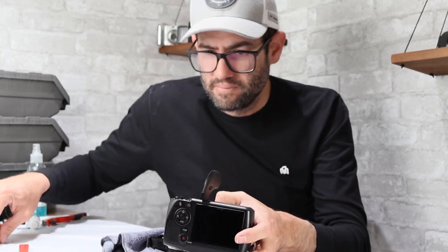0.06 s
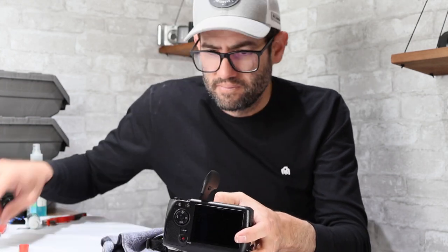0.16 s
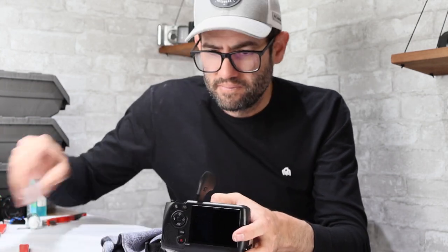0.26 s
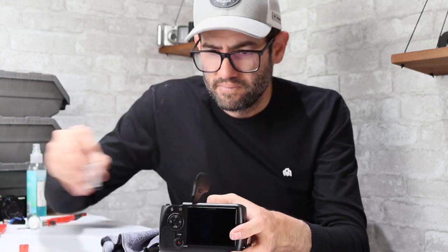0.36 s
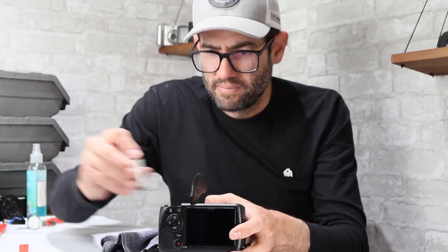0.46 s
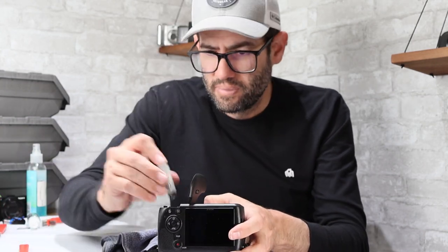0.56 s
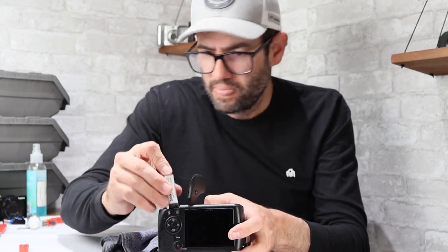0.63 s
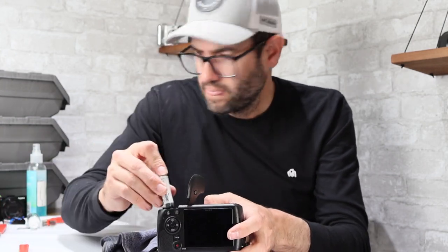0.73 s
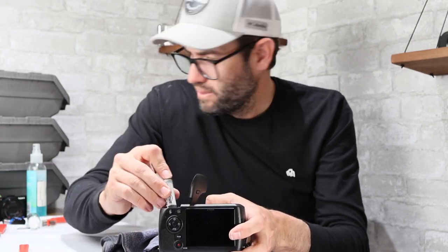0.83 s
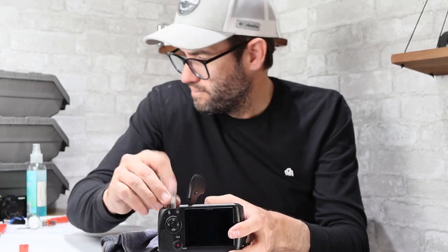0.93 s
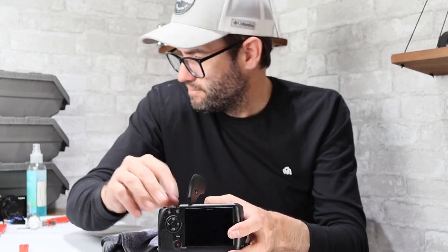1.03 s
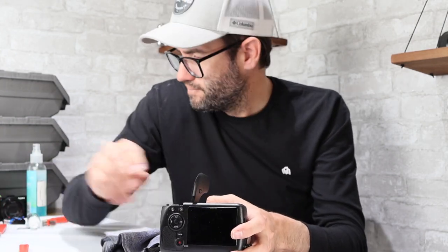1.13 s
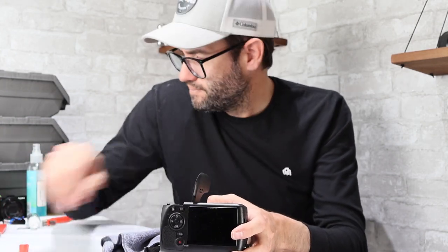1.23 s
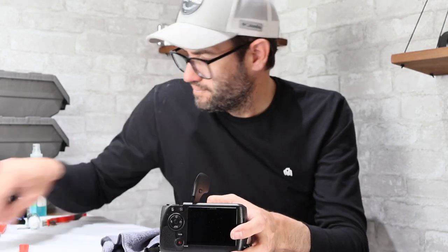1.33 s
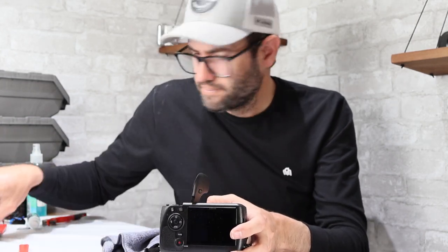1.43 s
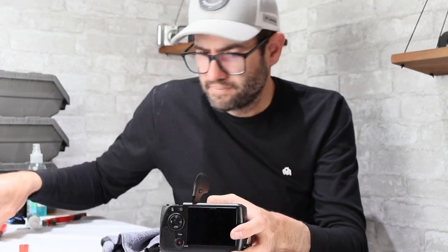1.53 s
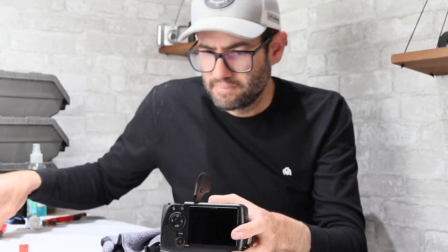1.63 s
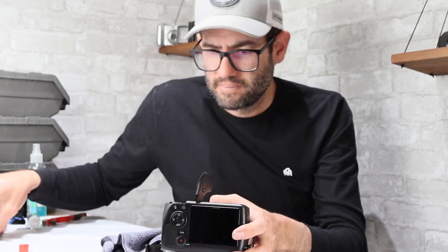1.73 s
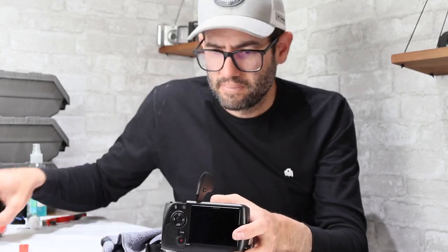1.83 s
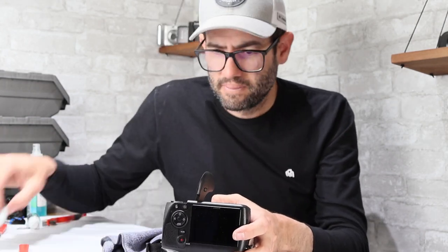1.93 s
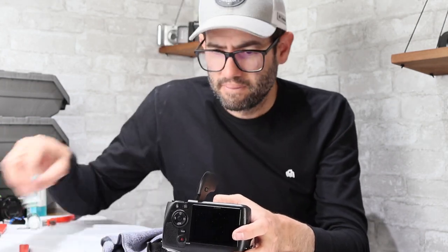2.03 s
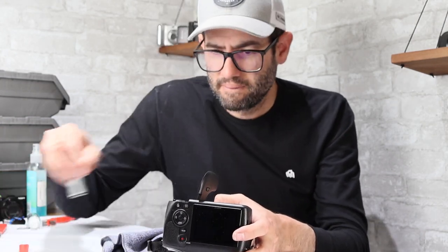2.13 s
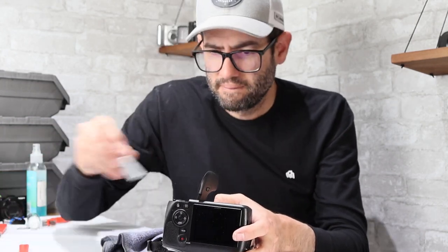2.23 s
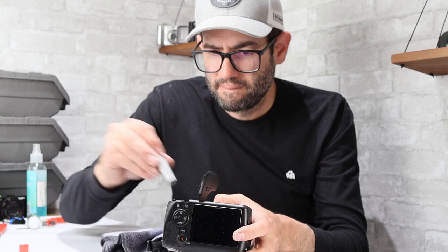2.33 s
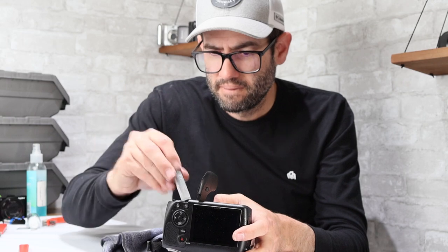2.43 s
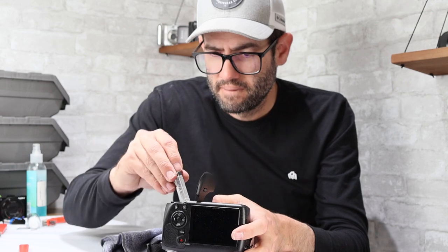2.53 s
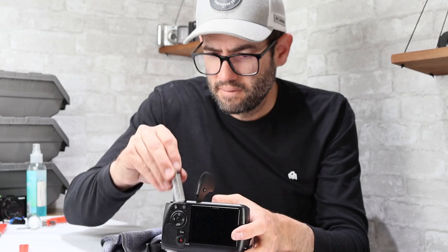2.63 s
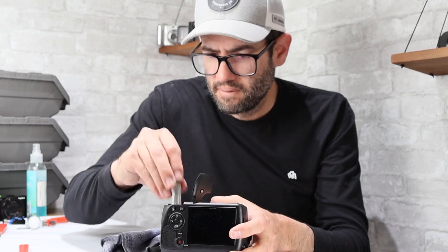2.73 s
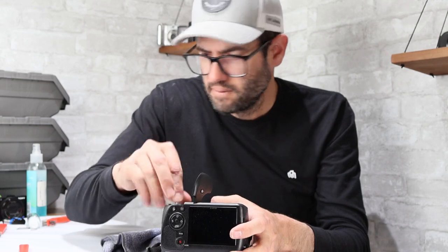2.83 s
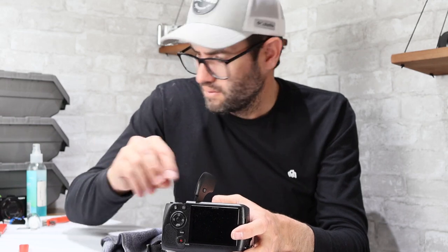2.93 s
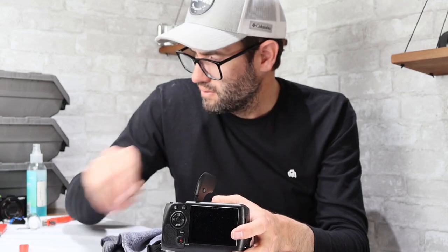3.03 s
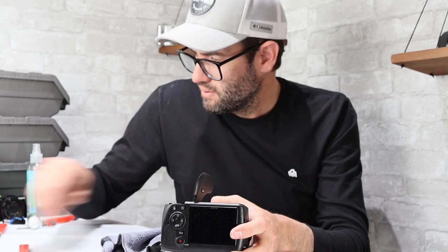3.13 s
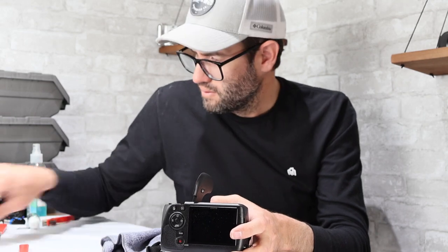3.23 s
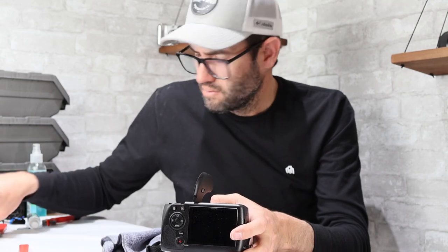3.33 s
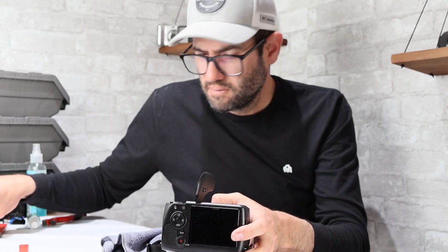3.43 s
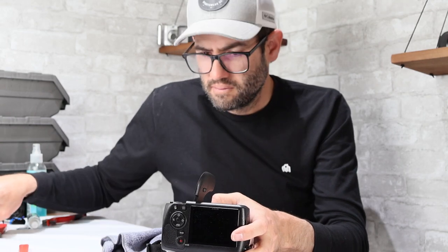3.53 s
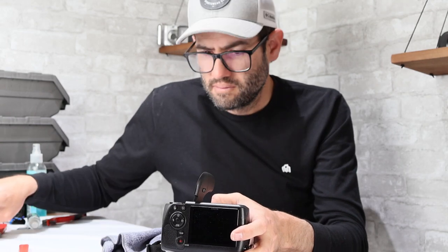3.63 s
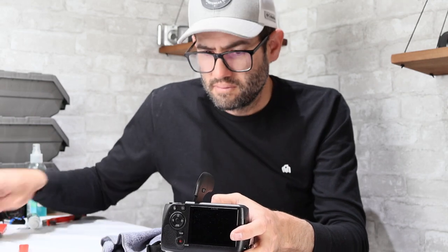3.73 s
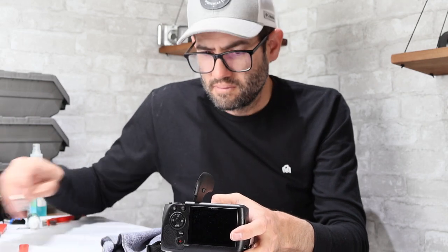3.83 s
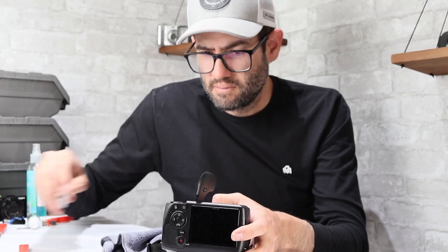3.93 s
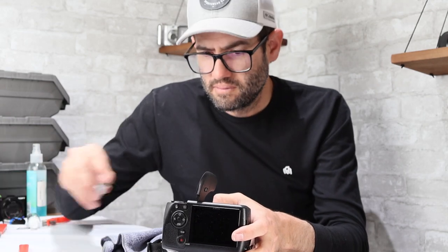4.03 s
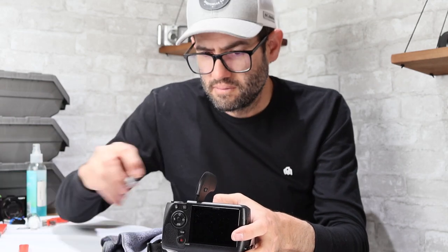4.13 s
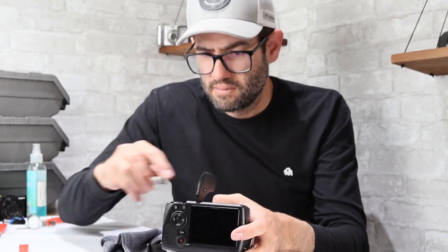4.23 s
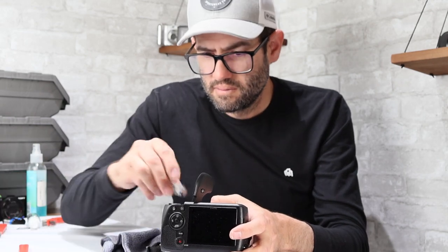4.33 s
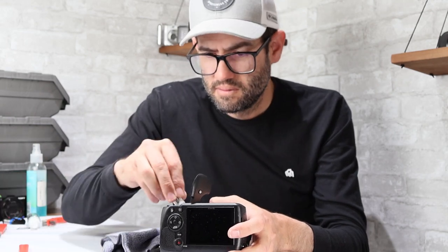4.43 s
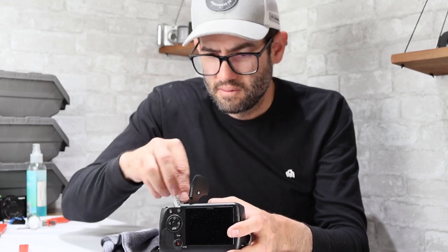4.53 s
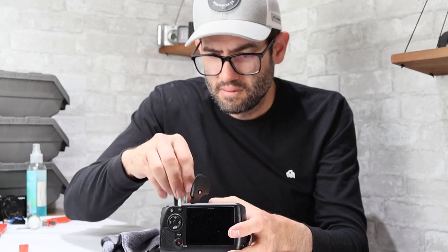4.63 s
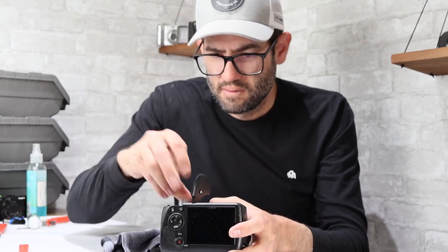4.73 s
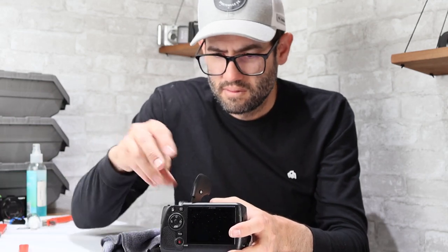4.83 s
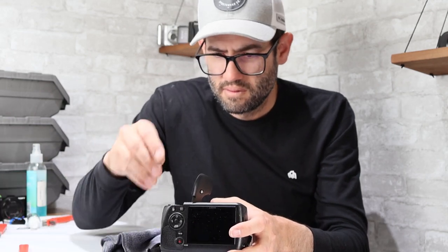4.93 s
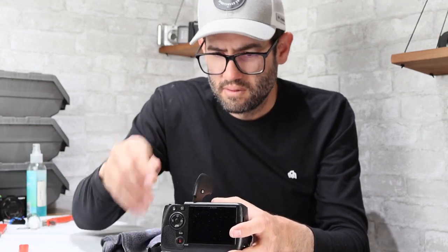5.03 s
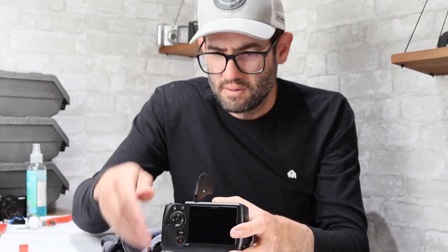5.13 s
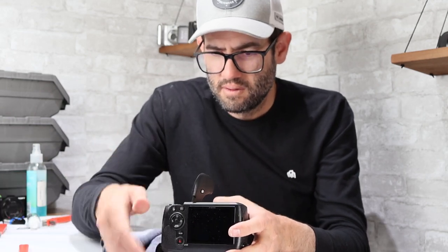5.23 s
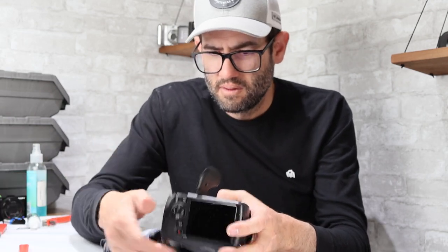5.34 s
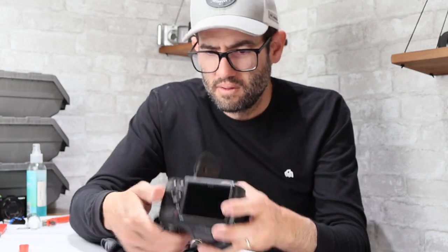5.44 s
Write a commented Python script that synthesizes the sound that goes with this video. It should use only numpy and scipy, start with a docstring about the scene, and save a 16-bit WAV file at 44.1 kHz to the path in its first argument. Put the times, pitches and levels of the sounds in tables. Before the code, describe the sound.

Close dry plastic clacks come in three bursts around one, three and nearly five seconds, as cells are dropped into a camera compartment and slide and rattle inside. In the gaps a dull table thud, a sharp pickup click, then soft brushing with several light clicks. Short small-room reverberation, low steady ventilation noise, almost centred stereo.

```python
"""Battery cells dropped into a camera

Three small battery cells are picked off a table and dropped one by one into a plastic camera in a small room.
Each cell knocks the rim, falls, bounces and rattles to rest: blows on damped modes, and a contact spring sings.
Loose cells click on the table; a hand thuds (modes of the board) and brushes (clumped crackle).
Ventilation hum and hiss lie underneath as shaped noise; left and right differ only by a faint hiss."""
import sys
import numpy as np
from scipy import signal
from scipy.fft import rfft, irfft, next_fast_len
from scipy.io import wavfile
from scipy.ndimage import uniform_filter1d

SR = 44100
rng = np.random.default_rng(int(sys.argv[2]) if len(sys.argv) > 2 else 0)


def generate_wav(sig):
    """Save sig (samples, or channels by samples) to the path in sys.argv[1] as 16-bit PCM at SR."""
    pcm = np.round(np.clip(np.atleast_2d(sig).T, -1, 1) * 32767).astype(np.int16)
    wavfile.write(sys.argv[1], SR, pcm)


N = 241385

# modes of the parts of the camera, before detuning and damping: (frequency [Hz], level [dB], t60 [s])
BODY_MODES = [(389, -8, 0.012), (452, -2.5, 0.091), (517, 3, 0.077), (606, 0, 0.083), (746, 0, 0.03)]  # hollow body
SHELL_MODES = [(970, -14, 0.043), (1026, 1, 0.042), (1218, -1, 0.016), (1358, -5, 0.007), (1348, 2, 0.029),
               (1538, -3.5, 0.025), (1699, -2, 0.031), (1830, -2, 0.016), (2101, 2.5, 0.014),
               (2395, 1, 0.0058)]
CELL_MODES = [(2800, 6.5, 0.0045), (3366, 2, 0.0081), (3610, -1.5, 0.014), (4130, -4, 0.0093),
              (4440, 0.5, 0.0058), (4630, -13, 0.042), (5090, -2, 0.0049)]
CONTACT_MODES = [(5590, 3.5, 0.0033), (6410, 3.5, 0.029), (7270, 2.5, 0.0053), (7960, -7, 0.019),
                 (9120, -9.5, 0.0016)]
SCRATCH_MODES = [(8580, 5, 0.0049), (10580, -2, 0.0086), (12600, -0.5, 0.006), (17400, -11, 0.009)]


def amp(db):
    """Level to gain: 20 dB is a factor of ten in amplitude."""
    return 10 ** (np.asarray(db) / 20)


def evened(x):
    """Normalization: scales the root mean square to 1."""
    return x / np.sqrt(np.mean(x ** 2) + 1e-20)


def read(points, hz):
    """Interpolation of a curve on a logarithmic frequency axis."""
    f, value = np.transpose(points)
    return np.interp(np.log(hz + 1), np.log(f + 1), value)


def coloured(x, points):
    """Linear filtering: multiplies the spectrum of x by a (Hz, dB) curve, then sets rms 1."""
    size = next_fast_len(N)
    gain = amp(read(points, np.fft.rfftfreq(size, 1 / SR)))
    return evened(irfft(rfft(x, size) * gain, size)[:N])


def track(curves, column, rest):
    """Amplitude modulation: the gain along several dB curves, at the rest level between them."""
    t = np.arange(N) / SR
    level_db = np.full(N, float(rest))
    for rows in curves:
        rows = np.array(rows)
        on = (t >= rows[0, 0]) & (t <= rows[-1, 0])
        level_db[on] = np.interp(t[on], rows[:, 0], rows[:, column])
    return uniform_filter1d(amp(level_db), size=300)


def add(mix, s, sound):
    """Superposition: adds a sound to the mix from second s."""
    part = mix[round(s * SR):][:len(sound)]
    part += sound[:len(part)]


def ring(modes, spread_db, detune, crack_db, crack_t60, size=3000):
    """Modal impulse response, peak 1: the spot struck sets each mode's share and pitch."""
    hz, db, t60 = np.transpose(modes)[:, :, None]
    share, shift = rng.standard_normal((2, len(modes), 1))
    t = np.arange(size) / SR
    # broad treble modes alternate in sign and merge
    sign = np.where(hz > 2500, (-1.) ** np.arange(len(hz))[:, None], 1)
    decay = amp(db + spread_db * share - 60 * t / np.maximum(t60, .002))
    tone = (sign * decay * np.sin(2 * np.pi * hz * (1 + detune * shift) * t)).sum(0)
    # countless small modes between the named ones blur into a crack of noise with the same outline
    fine_hz = np.fft.rfftfreq(size, 1 / SR)
    outline_hz = [0.18 * hz.min(), *hz[:, 0], 1.47 * hz.max()]
    outline_db = np.interp(fine_hz, outline_hz, [-40, *db[:, 0], -40], -100, -100)
    noise = irfft(rfft(rng.standard_normal(size)) * amp(outline_db), size)
    crack = evened(noise) * amp(-60 * t / crack_t60)
    blow = tone / abs(tone).max() + amp(crack_db) * crack
    blow *= 1 - np.exp(-t * 1.94 * hz.min())  # the contact takes about one cycle to build
    blow *= np.cos(np.pi / 2 * t / t[-1])  # the hand damps what is left
    return blow / abs(blow).max()


def strike(levels_db, parts, spread_db, detune, crack_db, crack_t60, size=3000):
    """Modal superposition: one blow sets all parts of an object ringing, each at its own peak level."""
    return sum(amp(db) * ring(modes, spread_db, detune, part_db, t60, size)
               for db, modes, part_db, t60 in zip(levels_db, parts, crack_db, crack_t60))


def knock(levels_db, panel_hz):
    """Selective excitation: a blow on the camera favours shell modes near the panel it lands on."""
    # shell modes one octave from the struck panel are 20.5 dB weaker
    shell = [(hz, db - 20.5 * np.log2(hz / panel_hz) ** 2, t60) for hz, db, t60 in SHELL_MODES]
    parts = (BODY_MODES, shell, CELL_MODES, CONTACT_MODES, SCRATCH_MODES)
    return strike(levels_db, parts, 3.4, 0.024,
                  crack_db=(-5.0, -10.0, -7.5, -2, -8), crack_t60=(0.03, 0.024, 0.019, 0.03, 0.031))


def knocks():
    """Impact excitation: knocks on the plastic, cell landings, spring snaps and grazes of the rim."""
    # cells knocking the camera: (time [s], shell peak [dB], body re shell [dB], cell re shell [dB],
    # pitch of the struck panel [Hz])
    knock_table = [(0.711, -12.5, -11.5, -2.5, 1240), (0.729, -13.5, -15.5, -3.5, 1590),
                   (0.742, -23, -4, -27, 1270), (0.829, -17, -22, -5, 1680),
                   (0.882, -10.5, -23.5, -8, 1630), (0.885, -11.5, -41, -14, 1600),
                   (0.891, -12, -20, -9, 1580), (0.898, -28.5, 0, -14, 1200), (0.91, -32, -11, 2, 1950),
                   (0.957, -31.5, -16, -8.5, 1700), (1.015, -16, -22, -11, 1920),
                   (1.024, -14.5, -31, -8.5, 1700), (1.045, -25, -8, 1.5, 1380),
                   (1.078, -6.5, -23.5, -9.5, 1680), (1.084, -12, -30, -7, 1940),
                   (1.088, -16, -26, -5, 1780), (1.154, -17.5, -27, -9, 1680),
                   (1.163, -17.5, -27, -17, 1550), (1.265, -31, -19, -5, 1490), (1.349, -37, -10, 6, 1740),
                   (2.541, -25, -9.5, 1, 2020), (2.544, -32.5, -4, 5, 1530), (2.652, -40.5, -1, -8, 1080),
                   (2.667, -30.5, -13, -16.5, 1270), (2.746, -20.5, -13, -3, 1340),
                   (2.753, -7.5, -16, -19, 1530), (2.756, -9.5, -18, -6, 1640),
                   (2.802, -28, -27, -11, 1410), (2.853, -34.5, -2.5, -3, 1700),
                   (2.88, -26, -5.5, -12, 1370), (2.923, -9.5, -21, -10.5, 1380),
                   (2.927, -21.5, -21, 8.5, 1860), (2.931, -14, -9.5, -7, 1670), (2.941, -8, -23, -9, 1860),
                   (2.97, -20, -23, -18, 1800), (2.977, -21, -32, -16, 1710), (2.984, -22, -27, -3, 1580),
                   (3.018, -22, -13, 1, 1390), (3.037, -27, -9, -6, 1450), (4.074, -44, -0.5, -13, 1010),
                   (4.083, -38, -19, -15, 1270), (4.183, -43, -5, -13, 1030), (4.199, -38.5, -4, -18, 1350),
                   (4.412, -40, -7, -15, 1020), (4.419, -39, -9, -9.5, 1350), (4.488, -9, -16, -5.5, 1430),
                   (4.498, -12, -9, -3, 1200), (4.531, -37, -18, -14, 1170), (4.57, -40.5, 3, -2, 1380),
                   (4.691, -31, -2.5, -8, 1270), (4.723, -19, -21, -9, 1600),
                   (4.732, -24.5, -10, -22, 1270), (4.78, -32, -6.5, -24, 1310),
                   (4.805, -28.5, 0, -14, 1510), (4.827, -20, -18, -15, 1280), (4.855, -27, -10, -15, 1500),
                   (4.873, -20.5, -15, -14, 1460), (4.888, -22, -7, -21, 1310),
                   (4.901, -22, -12, -11, 1150), (4.981, -16, -23, -14, 1360), (4.998, -25, -4, -11, 1480),
                   (5.011, -25, -32, -21, 1210), (5.058, -29, -15, -20, 1250),
                   (5.072, -21.5, -12, -20, 1120), (5.087, -24, -12, -1, 1380), (5.12, -29, -18, -8, 1260),
                   (5.149, -35, -10, -11, 1190), (5.242, -40, -13, -7, 1590), (5.43, -27.5, -16, -20, 1570),
                   (5.44, -32.5, -10.5, -5, 1640)]
    # a cell's edge grazes the rim: (time [s], scratch peak [dB])
    graze_table = [(0.711, -23), (0.729, -23.5), (1.06, -32), (2.544, -33), (4.968, -42)]
    # landing: (body, shell, cell, contacts) re the landing level [dB]
    landing_db = (-17, -11, -1, -13.5)
    # snap of the loaded spring: (body, shell, cell, contacts, scratch) re the spring tone [dB]
    snap_db = (-1.5, 11, 4, 9, 3.5)
    out = np.zeros(N)
    for s, db, body_db, cell_db, panel_hz in knock_table:
        relative_db = np.array([body_db, 0, cell_db, cell_db - 10, cell_db - 13.5])
        add(out, s, knock(db + relative_db, panel_hz))
    for s, db, scratch_db, _ in landings():
        add(out, s, knock(db + np.array([*landing_db, scratch_db]), panel_hz=1620))
    for s, _, db in pressings():
        add(out, s + .004, knock(db + np.array(snap_db), panel_hz=1460))  # snaps 4 ms after loading
    for s, db in graze_table:
        add(out, s, strike((db - 5, db), (CONTACT_MODES, SCRATCH_MODES), 1.7, 0.023,
                           crack_db=(-3, -3), crack_t60=(.02, .025)))
    return out


def landings():
    """Inelastic bouncing: flights shorten and landings weaken until the cell rests."""
    # each cell's fall to the slot floor: (first landing [s], peak [dB], first flight [s], rebound [0-1],
    # loss per bounce [dB], scratch re landing [dB], spring re landing [dB])
    drop_table = [(1.075, -19, 0.065, .645, 4, -7, -32), (2.918, -15, 0.051, .64, 6.5, -12, -16.5),
                  (4.859, -11.5, .105, .625, 4.5, -13.5, -16.5)]
    shortest_flight_s = .015  # each flight keeps the rebound share of its excess over this
    rest_flight_s = .0195  # no hop this short or shorter is sounded
    rows = []
    for s, db, flight, rebound, loss_db, scratch_db, spring_db in drop_table:
        rows.append((s, db, scratch_db, spring_db))
        while flight > rest_flight_s:
            s, db = s + flight, db - loss_db
            rows.append((s, db, scratch_db, spring_db))
            flight = shortest_flight_s + rebound * (flight - shortest_flight_s)
    return rows


def pressings():
    """Elastic loading: the spring is pressed by hand and by the rocking after each landing."""
    # loading by hand: (time [s], length [s], tone level [dB])
    hand_table = [(1.073, 0.015, -36), (2.541, 0.013, -33), (2.746, 0.0082, -49), (4.487, 0.011, -36)]
    rock_s, rock_length_s = .008, 0.0088  # delay after the landing, duration
    rocking = [(s + rock_s, rock_length_s, db + spring_db) for s, db, _, spring_db in landings()]
    return hand_table + rocking


def spring():
    """Frequency modulation: a thin wavering tone lasts while the spring is loaded, then is damped."""
    centre_hz, waver = 6710, 0.032  # waver is a share of the centre frequency
    out = np.zeros(N)
    for s, length, db in pressings():
        size = round(length * SR)
        noises = rng.standard_normal((2, 2000))
        pitch, level = (evened(uniform_filter1d(row, size=90))[:size] for row in noises)
        tone = np.sin(2 * np.pi * np.cumsum(centre_hz * (1 + waver * pitch)) / SR)
        add(out, s, amp(db + 1.3 * level) * tone * signal.windows.tukey(size, .4))
    return out


def specks(per_s, spread_db):
    """Poisson-like impulse train: random tiny impacts, mostly small, a few large."""
    size = amp(spread_db * np.minimum(rng.exponential(1, N), 4))
    present = rng.random(N) < per_s / SR
    return size * present * rng.choice([-1, 1], N)


def slides():
    """Stick-slip as random impacts: a cell slides and trembles in its slot, ringing the camera parts."""
    # one curve a slide: (time [s], level [dB], brightness [dB]: cell, contacts and scratch over the rest)
    slide_table = [
        [(0.76, -49, -17), (0.83, -51.5, -1)],
        [(0.93, -59, -15), (1.008, -49.5, 0), (1.148, -58, 4.5), (1.304, -61, 4.5), (1.35, -72, 3)],
        [(2.56, -40, -14), (2.612, -63, -17), (2.75, -66, -15)],
        [(2.8, -66, -3), (2.892, -53, 1.5), (2.924, -39.5, -18), (3.042, -51, 2), (3.1, -70, -13)],
        [(4.55, -81, 0), (4.78, -53.5, -8), (4.89, -43, -21), (4.95, -50.5, -16), (5.002, -46, -18),
         (5.14, -51.5, 4.5), (5.24, -73, -7)],
        [(5.3, -61.5, -2), (5.47, -53.5, -2.5)],
    ]
    parts = []
    for modes in (BODY_MODES, SHELL_MODES, CELL_MODES, CONTACT_MODES, SCRATCH_MODES):
        layers = [signal.oaconvolve(specks(90, 3.7), ring(modes, 9.0, 0.015, 1.7, 0.027))[:N] for _ in range(2)]
        parts.append(evened(sum(layers)))
    body, shell, cell, contacts, scratch = parts
    dull = amp(-1.5) * body + shell
    bright = cell + amp(-5.0) * contacts + amp(-8.5) * scratch
    brightness = track(slide_table, column=2, rest=-20)
    return track(slide_table, column=1, rest=-100) * (dull + brightness * bright)


def clicks():
    """Impact on small bodies: loose cells click on the table in three groups of short modes."""
    # (time [s], middle modes peak [dB], low modes re that peak [dB], high modes re that peak [dB])
    click_table = [(1.692, -22, -19, -30), (1.704, -48, -10, -10), (1.816, -46, -8, -20),
                   (1.868, -41.5, -8, -30), (3.267, -25.5, -8.5, -8.5), (3.404, -34.5, -20, -7),
                   (3.429, -30.5, -10, -4.5), (3.455, -36, -8, -5), (3.48, -37, -4, 1),
                   (3.516, -26, -9, -15), (3.626, -49.5, 12.5, -15), (3.648, -57, 8, -8),
                   (3.721, -34, -7, -6), (3.749, -48.5, 12.5, -3), (3.772, -44.5, -15, 6),
                   (3.783, -37.5, -0.5, 3), (3.796, -32, -16, -7)]
    # low, middle and high modes: (frequency [Hz], level [dB], t60 [s])
    loose_modes = [
        [(1200, -3, .005), (1900, 0, .004)],
        [(2600, -2, .002), (3500, 0, .0025), (4400, -1, .002), (5400, -3, .002)],
        [(6400, 0, .002), (7500, -2, .002), (9500, -8, .002), (13500, -10, .002)],
    ]
    out = np.zeros(N)
    for s, db, low_db, high_db in click_table:
        add(out, s, strike((db + low_db, db, db + high_db), loose_modes, 1.5, .05,
                           crack_db=(-12, -12, -6), crack_t60=(.012, .012, .015)))
    return out


def thuds():
    """Plate modes: the hand lands on the table and the board rings in three bands."""
    # (time [s], low push peak [dB], board peak [dB], tap peak [dB])
    thud_table = [(0.017, -41, -58, -70), (0.043, -41.5, -66, -70), (0.057, -50, -68, -44),
                  (1.555, -30, -20.5, -20.5), (3.439, -41, -38.5, -62), (3.469, -39, -62, -59)]
    # modes of the push, the board and the tap: (frequency [Hz], level [dB], t60 [s])
    board_modes = [
        [(102, 2, 0.056), (150.5, 1, 0.011), (253.6, -3.5, 0.17)],
        [(312, -7.5, 0.2), (429.5, -6.5, 0.27), (490, -7, 0.17), (554, -2, 0.066), (734, -8.5, 0.034)],
        [(820, 3.5, 0.017), (1115, -0.5, 0.04), (1330, -10, 0.075), (1640, -12, 0.027), (2200, -17, 0.022)],
    ]
    out = np.zeros(N)
    for s, *levels_db in thud_table:
        add(out, s, strike(levels_db, board_modes, 1.0, 0.01,
                           crack_db=(-8, -4, -5), crack_t60=(.08, .12, .07), size=8000))
    return out


def brush():
    """Friction noise: clumped crackle of skin on cloth, with the rumble it leaves in the board."""
    # one curve a stroke of the fingers over cloth and table: (time [s], crackle level [dB])
    brush_table = [
        [(0.0, -73), (0.07, -55), (0.102, -62), (0.3, -70)],
        [(1.7, -69), (1.742, -58), (1.886, -69), (1.95, -90)],
        [(3.38, -66), (3.45, -46), (3.544, -61.5), (3.568, -55), (3.69, -59.5), (3.73, -54), (3.792, -47.5),
         (3.9, -88)],
    ]
    # spectrum of the crackle: (frequency [Hz], relative level [dB per Hz])
    crackle_colour = [(530, -58), (900, -3.5), (1170, -4.5), (1270, -5), (2880, -9), (4710, -13),
                      (11800, -24.5), (15800, -30)]
    rumble_colour = [(50, -30), (120, -2.5), (300, -1), (700, -2.0), (1500, -48)]  # (Hz, dB)
    clumps = evened(uniform_filter1d(uniform_filter1d(rng.standard_normal(N), size=250), size=250))
    grains = specks(3500, 3.1) + 1.3 * rng.standard_normal(N)
    crackle = coloured(grains * amp(3.4 * clumps), crackle_colour)
    rumble = coloured(rng.standard_normal(N), rumble_colour)
    return track(brush_table, column=1, rest=-100) * (crackle + amp(-3.5) * rumble)


def room(x):
    """Reverberation: sparse reflections of random sign, each band dying at its own speed."""
    # decay of the room: (frequency [Hz], t60 [s])
    wall_decay = [(300, 0.23), (1000, 0.19), (3000, .2), (8000, 0.24), (15000, 0.14)]
    out = np.zeros(N)
    turn = 2 * np.pi * 7 * np.arange(N) / SR
    for window in (np.sin(turn), np.cos(turn)):  # two tails take turns
        taps = np.zeros(SR // 2)
        at = np.arange(120, len(taps) - 20, 20)
        taps[at + rng.integers(0, 20, len(at))] = rng.choice([-1., 1.], len(at))
        hz, t, z = signal.stft(taps, SR, nperseg=256)
        t60 = np.maximum(read(wall_decay, hz), .03)[:, None]
        tail = signal.istft(z * amp(-60 * t / t60), SR, nperseg=256)[1]
        out += signal.oaconvolve(x * window, tail / np.linalg.norm(tail))[:N]
    return out


def air():
    """Filtered noise: broad ventilation noise with narrow wavering hums, slowly swelling."""
    # spectrum of the broad noise: (frequency [Hz], relative level [dB per Hz])
    air_colour = [(12, -55), (20, -19), (59, -13), (113, -11.5), (126, -9.5), (171, -5), (334, -9),
                  (523, -9.5), (618, -7), (772, -10.5), (1210, -17.5), (2050, -23.5), (2290, -25.5),
                  (4120, -27), (15700, -34.5)]
    # resonances, levels before the swell: (centre [Hz], width at half amplitude [Hz], rms level [dB])
    hum_table = [(58.7, 17, -74), (139.3, 6.9, -67.5), (169.2, 10.2, -63.5), (236, 18, -68.5),
                 (521, 4.7, -64), (650, 27, -65.5), (1666, 15, -78), (2105, 320, -73.5)]
    size = next_fast_len(N)
    hz = np.fft.rfftfreq(size, 1 / SR)
    out = amp(-55.5) * coloured(rng.standard_normal(N), air_colour)
    for centre_hz, width_hz, db in hum_table:
        peak = 1 / (1 + (2 * (hz - centre_hz) / width_hz) ** 2)
        hum = irfft(rfft(rng.standard_normal(N), size) * peak, size)[:N]
        out = out + amp(db) * evened(hum)
    swell = evened(uniform_filter1d(uniform_filter1d(rng.standard_normal(N), size=9000), size=9000))
    return out * amp(0.6 * swell)


def side_hiss():
    """Decorrelation: a faint noise to be added on the left and subtracted on the right."""
    # spectrum of the hiss: (frequency [Hz], relative level [dB per Hz])
    hiss_colour = [(12, -10), (20, 12), (42, 3.5), (158, -1.5), (1950, -19), (2180, -16), (13700, -15),
                   (15800, -9.5)]
    return amp(-69.5) * coloured(rng.standard_normal(N), hiss_colour)


def highpass(x, order, hz):
    """Radiation limit: a Butterworth filter removes the bass below hz."""
    return signal.sosfilt(signal.butter(order, hz, "high", fs=SR, output="sos"), x)


def scene():
    """Direct and reverberant field: the camera is too small to radiate bass; the table is wetter."""
    camera = highpass(knocks() + slides(), 4, 280)
    tone = spring()
    table = highpass(clicks() + thuds() + brush(), 2, 80)
    reverb = room(amp(-8) * camera + amp(-6.0) * table + amp(-19) * tone)
    mid = camera + table + reverb + tone + air()
    side = side_hiss()
    return np.array([mid + side, mid - side])


def record(dry):
    """Band limiting: a linear-phase low-pass filter at 16.3 kHz."""
    lowpass = signal.firwin(511, 16300, window=("kaiser", 9), fs=SR)
    return signal.oaconvolve(dry, lowpass[None], "same")


dry = scene()
out = record(dry)
generate_wav(out)
```